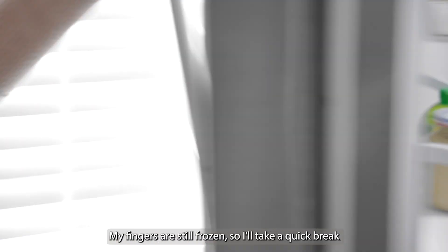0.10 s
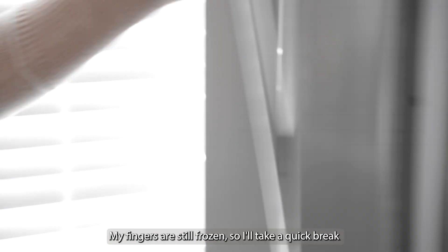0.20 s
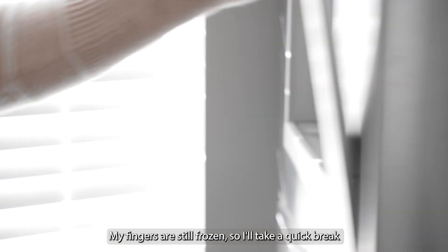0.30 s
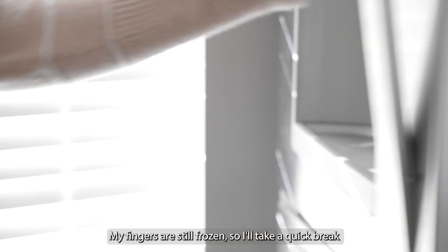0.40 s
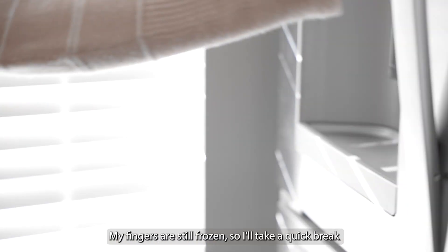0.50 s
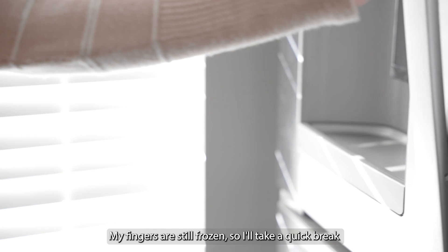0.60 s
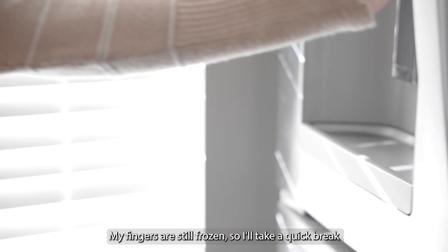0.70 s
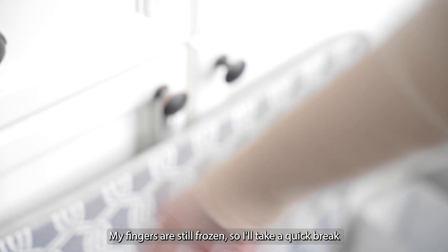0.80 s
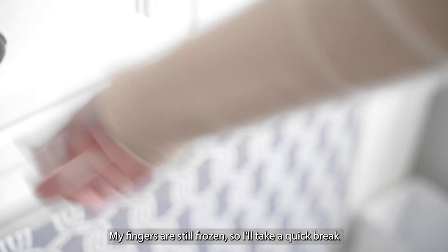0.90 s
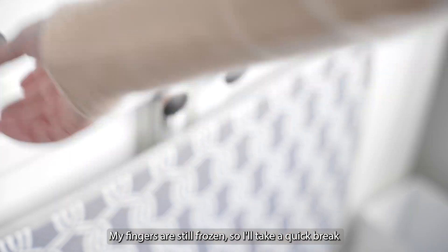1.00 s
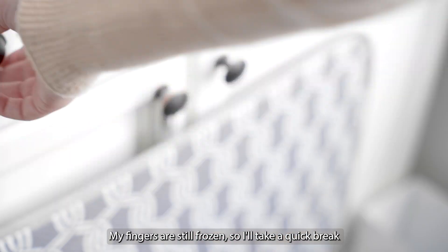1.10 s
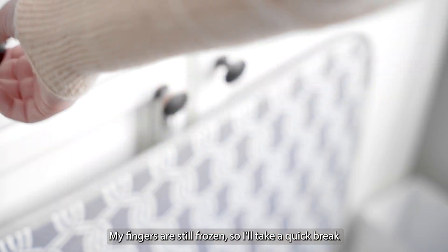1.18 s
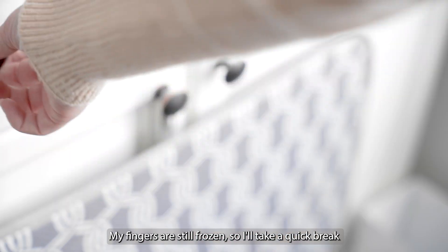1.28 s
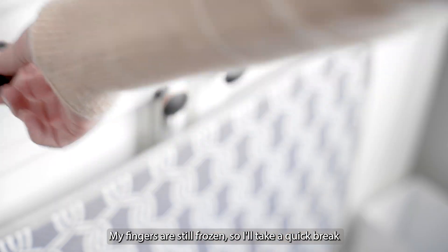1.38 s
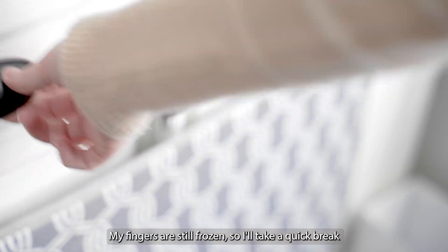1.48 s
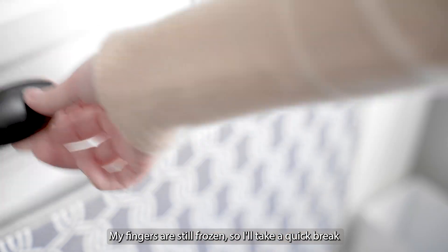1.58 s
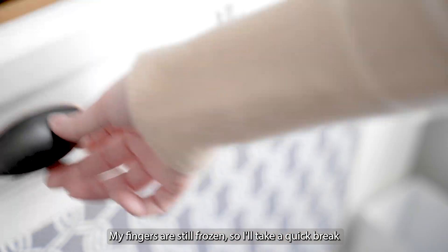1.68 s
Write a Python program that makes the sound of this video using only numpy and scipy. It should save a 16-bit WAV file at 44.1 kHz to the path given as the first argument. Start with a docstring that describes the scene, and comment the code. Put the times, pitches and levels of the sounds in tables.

```python
"""A refrigerator door is pulled, and jars and bottles jostle on the door shelf. These are short bursts of
shaped noise over a cluster of fading tones, and they break off abruptly. Then a low tone hums, a sleeve brushes
by, a handle knocks and a drawer rolls open, mostly growing louder. The rolling is made of tiny random ticks,
with knocks and a hard clink from the drawer. Soft noise, the air of the kitchen, lies under everything."""
import sys
import numpy as np
from scipy import signal
from scipy.fft import rfft, irfft
from scipy.io import wavfile

SR = 44100
rng = np.random.default_rng(int(sys.argv[2]) if len(sys.argv) > 2 else 0)


def file_out(sig):
    """Save sig as 16-bit WAV at sys.argv[1]."""
    # one column per channel
    cols = np.atleast_2d(sig).T
    # limit, then scale
    lim = np.clip(cols, -1, 1)
    pcm = np.round(lim * 32767).astype(np.int16)
    wavfile.write(sys.argv[1], SR, pcm)


N = 74970
T, HZ = np.arange(N) / SR, np.fft.rfftfreq(N, 1 / SR)  # time of each sample, pitch of each spectrum bin


def amp(db):
    """Turns decibels into a gain."""
    return 10 ** (np.asarray(db) / 20)


def evened(x):
    """Scales a sound to an average strength (rms) of 1."""
    return x / np.sqrt(np.mean(x ** 2) + 1e-20)


def read(table, column=1):
    """Reads one column of a table at every frequency, with straight lines over log frequency."""
    table = np.array(table)
    return np.interp(np.log(HZ + 1), np.log(table[:, 0]), table[:, column])


def over_time(table):
    """Reads a table of times and decibels at every sample, holding its last value."""
    return np.interp(T, *np.transpose(table))


def delayed(x, s):
    """Makes a sound start s seconds later."""
    return np.pad(x, ((0, 0), (round(s * SR), 0)))[:, :N]


# How two microphones hear noise.
# Each row: frequency in Hz, left-right likeness (1 = identical), left minus right in dB at a pan of 1.
MICROPHONE_PAIR = [(40, .9998, 0), (90, .999, 0), (190, .996, 0), (350, .95, -1), (700, .86, -2),
                   (1400, .62, .3), (2800, .3, -3), (5600, .05, -3), (10000, 0, -7), (14000, -.1, -5)]


def coloured(db, pan=0, drive=1):
    """Noise of rms 1 with a given spectrum; low notes reach both microphones alike, high ones differ."""
    mid, side = rfft(rng.standard_normal((2, N)) * drive)
    likeness = np.clip(read(MICROPHONE_PAIR), -.99, .9999)
    mid = mid * np.sqrt(1 + likeness)
    side = side * np.sqrt(1 - likeness)
    lean = amp(pan * read(MICROPHONE_PAIR, 2) / 2)
    both = np.array([(mid + side) * lean, (mid - side) / lean])
    return evened(irfft(both * amp(db), N))


def ring(modes, s):
    """Fading sine tones, each reaching the two microphones in its own phase."""
    out = 0
    for hz, db, t60 in modes:
        phase = rng.random() + rng.standard_normal((2, 1)) * hz / 14000
        out = out + amp(db - 60 * T / t60) * np.sin(2 * np.pi * (hz * T + phase))
    soft_start = 1 - np.exp(-T / 0.00067)
    return delayed(out * soft_start, s)


BASS_HZ, TREBLE_HZ = 216, 3432  # bass lies below the first, treble above the second
RING_OCTAVES = .33  # half-width of the boost around the ring
TONE_T60_S = .15  # time for the clean tone to fade by 60 dB


def blow(body, room_db, pan, s, db, bass_db, treble_db, ring_hz, ring_db, tone_db, rise, panels_db=0):
    """A blow rings one clean tone; the body's noise dies band by band and leaves a room tail."""
    bass = bass_db / (1 + (HZ / BASS_HZ) ** 4)
    treble = treble_db * HZ ** 4 / (HZ ** 4 + TREBLE_HZ ** 4)
    boost = ring_db / (1 + (np.log2((HZ + 1) / ring_hz) / RING_OCTAVES) ** 2)
    spectrum = rfft(coloured(read(body) + panels_db, pan)) * amp(bass + treble + boost)
    out = ring([(ring_hz, tone_db, TONE_T60_S)], 0)
    for k, (hz, _, body_t60, room_t60) in enumerate(body):
        # a band is full at its own row and fades out towards the neighbouring rows
        band = read([(row[0], j == k) for j, row in enumerate(body)])
        decay = np.hypot(amp(-60 * T / body_t60), amp(room_db - 60 * T / room_t60))
        onset = 1 - np.exp(-T / (rise + 0.45 / hz))  # low bands start more slowly
        out = out + irfft(spectrum * band, N) * decay * onset
    return delayed(amp(db) * out, s)


# Colour of the kitchen air. Each row: frequency in Hz, strength in dB per Hz (relative).
AIR_SPECTRUM = [(25, -1.5), (90, 1.5), (160, -6.5), (300, -10), (550, -21.5), (1200, -24), (4000, -29.5),
                (10500, -29), (13000, -26), (16000, -21.5)]
AIR_DB = -55


def air():
    """Steady noise, the quiet air of the kitchen."""
    return amp(AIR_DB) * coloured(read(AIR_SPECTRUM))


# Tones of the low hum. Each row: frequency in Hz, level in dB (relative), size of the pitch waver in Hz.
HUM_TONES = [(362, 0, 5), (370, -3, 32), (295, -6, 22)]
# Swell of the hum. Each row: time in seconds, level in dB.
HUM_SWELL = [(.6, -79.5), (.72, -63.5), (.8, -56), (1.0, -51), (1.12, -52.5), (1.3, -62.5)]


def hum():
    """Low tones whose pitch wavers at random; they swell before the drawer rolls, then sink."""
    tones = 0
    for hz, db, waver_hz in HUM_TONES:
        slow_noise = rfft(rng.standard_normal(N)) * np.exp(-(HZ / 35) ** 2)
        waver = evened(irfft(slow_noise, N))
        tones = tones + amp(db) * np.sin(2 * np.pi * np.cumsum(hz + waver_hz * waver) / SR)
    return evened(tones) * amp(over_time(HUM_SWELL))


# Colour of the brushing cloth. Each row: frequency in Hz, strength in dB per Hz (relative).
SLEEVE_SPECTRUM = [(100, -21.5), (220, 23), (450, -7), (1500, -6), (4000, -10), (7500, -11.5), (10000, -23),
                   (15000, -13)]
SLEEVE_S, SLEEVE_LENGTH_S, SLEEVE_DB = 1.0, 0.047, -49  # loudest moment, swell and fade time, peak level


def sleeve():
    """A knitted sleeve brushes by as the hand takes the handle: noise that swells and fades."""
    return coloured(read(SLEEVE_SPECTRUM)) * amp(SLEEVE_DB) * np.exp(-abs(T - SLEEVE_S) / SLEEVE_LENGTH_S)


DRAWER_PAN = -.15  # share of the left-right lean, turned the other way

# Resonances of the drawer's panels. Each row: frequency in Hz, half-width in Hz, boost in dB.
PANELS = [(80, 16, 13.5), (263, 55, 10), (475, 27, 2.5), (584.5, 54, 11), (710, 48, 1.5), (828, 29, 7),
          (940, 73, 0.5), (1107, 36, 7.5), (1300, 78, 11.5), (1460, 37, 4), (1825, 150, 10.5),
          (2600, 65, 4)]


def panel_boost():
    """Panels strengthen the sound around their own resonances; the boosts add up in dB."""
    return sum(db / (1 + ((HZ - hz) / width) ** 2) for hz, width, db in PANELS)


# Colour of the rolling before the panels. Each row: frequency in Hz, strength in dB per Hz (relative).
ROLL_SPECTRUM = [(30, -28), (80, -23.5), (300, 1.5), (850, -5), (1700, -10), (2800, -11.5), (4000, -21),
                 (5800, -31), (7000, -36), (15000, -43)]
ROLL_DB = -33
BRIGHTEN = 0.53  # extra dB of treble for each dB of speed
GRAINS_PER_S, GRAIN_SPREAD_DB = 5000, -0.5  # average number of ticks, and how unequal they are


def roll(speed_db):
    """Rollers patter along the runners and shake the panels; speed makes them louder and brighter."""
    ticks = rng.random(N) < GRAINS_PER_S / SR
    strengths = amp(GRAIN_SPREAD_DB * np.minimum(rng.exponential(1, N), 3))
    patter = coloured(read(ROLL_SPECTRUM) + panel_boost(), DRAWER_PAN, ticks * strengths)
    bright = irfft(rfft(patter) * HZ ** 2 / (HZ ** 2 + TREBLE_HZ ** 2), N)
    dull = patter - bright
    return amp(ROLL_DB + speed_db) * (dull + bright * amp(BRIGHTEN * speed_db))


# Colour of the drawer's deep rumble. Each row: frequency in Hz, strength in dB per Hz (relative).
RUMBLE_SPECTRUM = [(25, -33), (60, 3.5), (100, -2.5), (240, -3.5), (400, -16), (1000, -51)]
RUMBLE_DB, RUMBLE_LIMIT_DB = -39.5, -10  # top level, and the speed in dB above which it stops growing


def rumble(speed_db):
    """Deep noise that grows with the drawer's speed up to a limit."""
    return coloured(read(RUMBLE_SPECTRUM)) * amp(RUMBLE_DB + np.minimum(speed_db - RUMBLE_LIMIT_DB, 0))


# Knocks of the handle and drawer.
# Each row: start in seconds, level in dB (relative), bass in dB, treble in dB, ring in Hz,
# boost around the ring in dB, its clean tone in dB (relative), time constant of the noise's rise in seconds.
KNOCKS = [(.872, -27.5, -5, -4, 1450, 4.4, -9.5, .002), (0.902, -21.5, -5, 1.5, 511, 7.6, -1.5, 0.001),
          (.960, -17.5, 2, -15, 150, 9, 12.5, 0.00037), (1.118, -11, -4, -4, 1840, 2.9, -24, 0.0018),
          (1.231, -13.5, 12, -8, 139, 6, 15.5, 0.0034), (1.305, -18, 12, -19, 103, 9, 14, 0.0027),
          (1.481, -14, -13, -4, 1147, 4.6, 13, 0.0062), (1.549, -15, 10.5, 26, 255.6, 4.2, 12.5, 0.0037),
          (1.658, 0, -11, 9.5, 3630, 4.9, -24, 0.001)]
# How the drawer sounds when struck. Each row: frequency in Hz, strength in dB per Hz (relative),
# seconds for the body to fade by 60 dB, seconds for the room to fade by 60 dB.
DRAWER_BODY = [(35, -9.5, .15, .4), (90.6, -6, 0.14, 0.36), (300, 2, 0.086, 0.51), (800, -5.5, 0.13, 0.21),
               (1750, -7.5, 0.13, 0.66), (3000, -8.5, 0.1, 0.33), (5300, -19, 0.027, 0.32),
               (7300, -43, 0.044, 0.43), (15000, -51, .05, .2)]
DRAWER_DB, DRAWER_ROOM_DB = -31, -9  # level of the knocks, and of their room tail against the body
KNOCK_PANEL_SHARE = 0.48  # share of the panel boost heard in a knock


def knocks():
    """The handle and the drawer's contents knock on the drawer, whose panels answer in part."""
    panels_db = KNOCK_PANEL_SHARE * panel_boost()
    blows = sum(blow(DRAWER_BODY, DRAWER_ROOM_DB, DRAWER_PAN, *row, panels_db) for row in KNOCKS)
    return amp(DRAWER_DB) * blows


# Tones of something hard in the drawer.
# Each row: frequency in Hz, level in dB, seconds to fade by 60 dB.
CLINK_TONES = [(2620, -43, .15), (3300, -47, .15), (4330, -43, .16), (4920, -43, .16)]
CLINK_S = 1.659


def clink():
    """Something hard in the drawer clinks: a few high tones that die quickly."""
    return ring(CLINK_TONES, CLINK_S)


# Speed of the drawer, given as loudness. Each row: time in seconds, level in dB (relative).
DRAWER_SPEED = [(1.08, -36.5), (1.15, -16.5), (1.22, -17), (1.27, -11), (1.35, -7), (1.46, -1.5), (1.6, -1),
                (1.7, 1.5)]


def drawer():
    """One speed curve drives roll and rumble; knocks and a clink come on top."""
    speed_db = np.interp(T, *np.transpose(DRAWER_SPEED), left=-120)  # nearly silent before it moves
    return roll(speed_db) + rumble(speed_db) + knocks() + clink()


# Blows on the refrigerator door and its shelf.
# Each row: start in seconds, level in dB (relative), bass in dB, treble in dB, ring in Hz,
# boost around the ring in dB, its clean tone in dB (relative), time constant of the noise's rise in seconds.
DOOR_BLOWS = [(.129, -28.5, -28, -14.5, 321, 20, 6, 0.0055), (.189, -28.5, -22.5, -1, 336, 9, 3.5, 0.0094),
              (0.2159, -2, -8.5, 0, 642, 0, -8, 0.00033), (.2232, -8, -23, 6.5, 1391, 12.5, -2.5, 0.00049),
              (.257, -16.5, 13, -20, 693, 14, 10.5, 0.0016), (0.28, -8, -4.5, -5, 800, 4.5, -1.5, 0.0056),
              (.303, -9.5, -5, -5.5, 172, 2, 1, 0.0025), (.329, -7.5, 6.5, -14.5, 49.6, 3, -10, 0.0033),
              (0.3669, -8, -15, -11, 1900, 6.5, -11.5, 0.0013),
              (.375, -17.5, 2, -16, 1196, 8.5, 5.5, 0.002), (0.404, -16.5, 9.5, -18.5, 181, 11, 0.5, 0.012),
              (0.446, -15, -1, -13, 222, 1.5, -0.5, 0.0089), (.472, -11, 13, -16, 288, 0, -7, 0.018),
              (0.508, -15.5, -7, -4, 2600, 6, -22, .02), (.533, -20, 3, -4, 3000, 9, -23, 0.0015),
              (0.537, -8, 3, -4, 75.6, 7.5, -5.5, 0.00053), (0.5453, -14, 5, 2, 912, -4, 0.5, 0.0011),
              (0.571, -17, 2.5, -0.5, 170, 11, -3.5, .003)]
# How door and shelf sound together. Each row: frequency in Hz, strength in dB per Hz (relative),
# seconds for the body to fade by 60 dB, seconds for the room to fade by 60 dB.
DOOR_BODY = [(40, -12.5, 0.35, 0.47), (150, -8, .2, 1), (305, -2, 0.16, 0.68), (606, -1, 0.093, 0.44),
             (1400, -7.5, .11, 0.83), (2100, -6.5, 0.071, 0.33), (3780, -15, 0.045, 0.52),
             (8000, -25, 0.16, 0.55), (15000, -27.5, .08, 0.2)]
DOOR_DB, DOOR_ROOM_DB = -7.5, -11  # level of the blows, and of their room tail against the body
DOOR_PAN = 0.69  # share of the left-right lean
# A cluster of fading tones that sounds with the door's blows. # Each row: frequency in Hz, level in dB, seconds
# to fade by 60 dB.
DOOR_TONES = [(178, -29, .8), (291, -23, .95), (330, -26, .4), (478, -21, .42), (535, -23, .42),
              (612, -26, .45), (662, -22, .5), (813, -27, .6), (873, -32, .6), (908, -34, .85),
              (979, -30, .42), (1121, -27, .45), (1182, -29, .4), (1253, -31, .55), (1421, -25, .5),
              (1474, -26, .3), (1575, -32, .5), (1733, -33, .5), (1990, -31, .35), (3214, -42, .35)]
TONES_START_S = .2165
# the moment the door's sound breaks off, then the level and fall of its steep drop and of its faint tail
CUT_S, CUT_DROP_DB, CUT_FADE_DB_PER_S = 0.5854, -3.5, 900
CUT_TAIL_DB, CUT_TAIL_DB_PER_S = -27, 236


def fridge():
    """The door jolts and its jars knock over a cluster of fading tones; the sound breaks off, leaving a faint,
    short tail."""
    blows = sum(blow(DOOR_BODY, DOOR_ROOM_DB, DOOR_PAN, *row) for row in DOOR_BLOWS)
    door = amp(DOOR_DB) * blows + ring(DOOR_TONES, TONES_START_S)
    since = np.maximum(T - CUT_S, 0)
    drop = amp(CUT_DROP_DB - CUT_FADE_DB_PER_S * since)
    tail = amp(CUT_TAIL_DB - CUT_TAIL_DB_PER_S * since)
    return door * np.where(T > CUT_S, drop + tail, 1)


def scene():
    """Refrigerator, then sleeve and drawer, over the kitchen's air and hum."""
    return air() + hum() + sleeve() + drawer() + fridge()


LOW_CUT_HZ, EDGE_HZ = 26, 15950  # lowest and highest frequencies let through


def record(dry):
    """Weakens the deepest bass, limits the peaks to full scale and removes the highest treble."""
    low_cut = signal.butter(1, LOW_CUT_HZ, "high", fs=SR, output="sos")
    limited = np.clip(signal.sosfilt(low_cut, dry), -1, 1)
    high_cut = signal.firwin(401, EDGE_HZ, window=("kaiser", 9), fs=SR)
    return signal.oaconvolve(limited, high_cut[None], "same", axes=1)


dry = scene()
out = record(dry)
file_out(out)
```